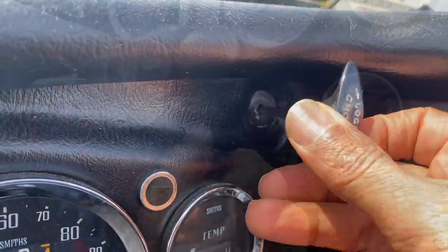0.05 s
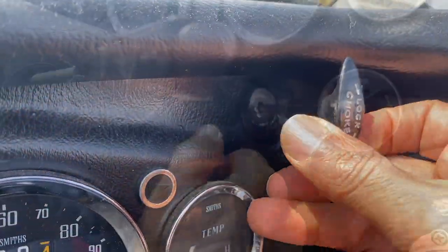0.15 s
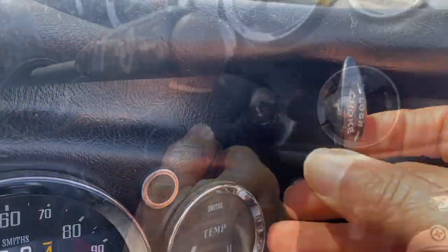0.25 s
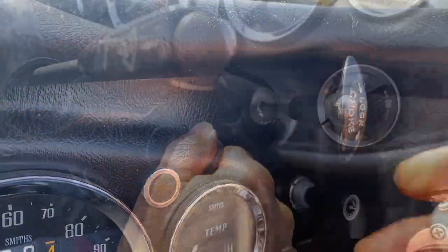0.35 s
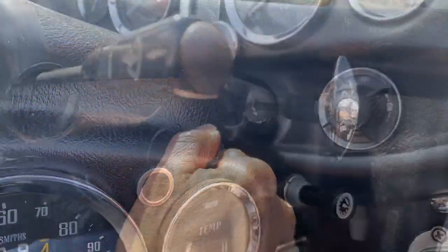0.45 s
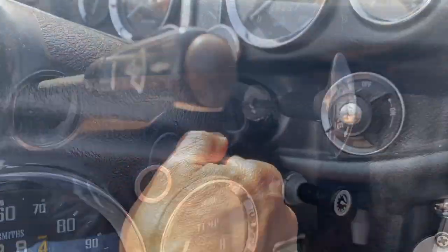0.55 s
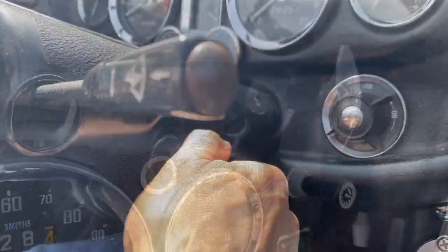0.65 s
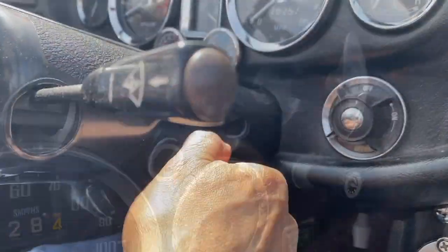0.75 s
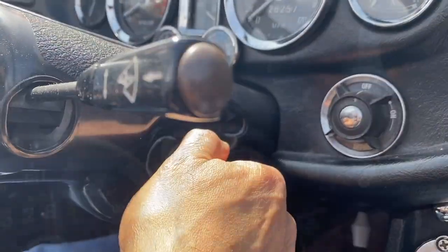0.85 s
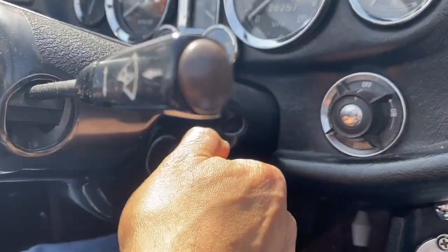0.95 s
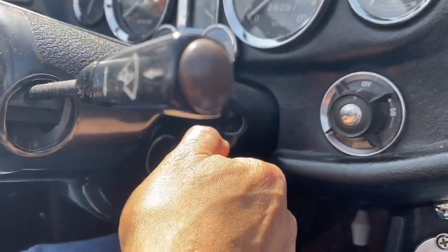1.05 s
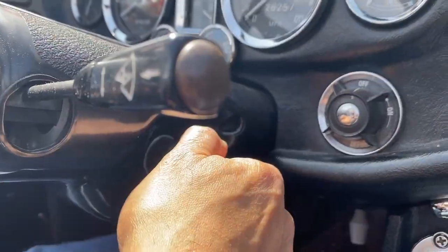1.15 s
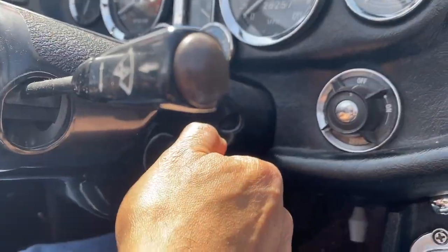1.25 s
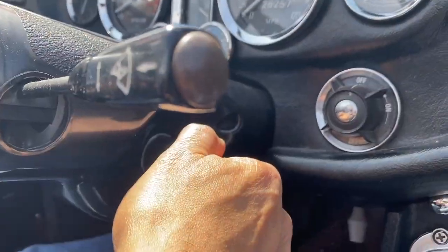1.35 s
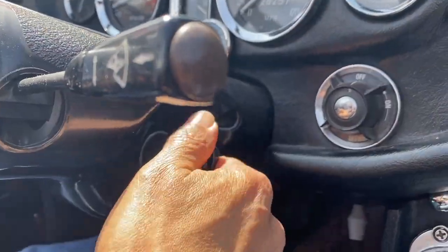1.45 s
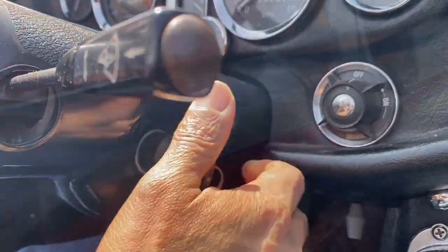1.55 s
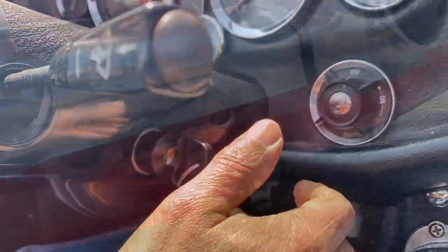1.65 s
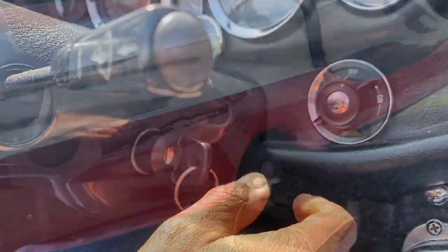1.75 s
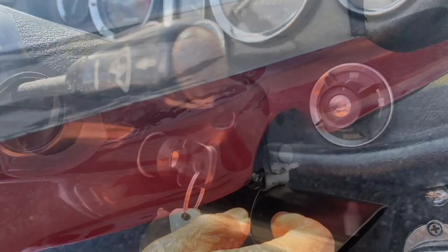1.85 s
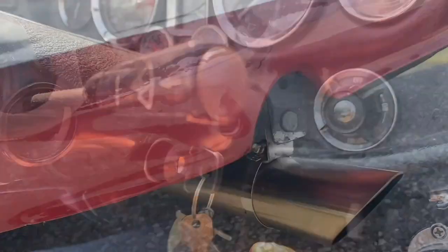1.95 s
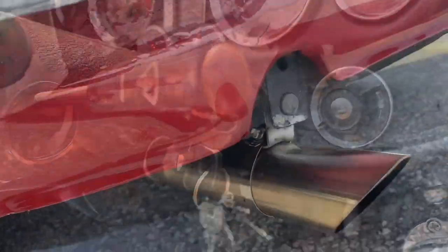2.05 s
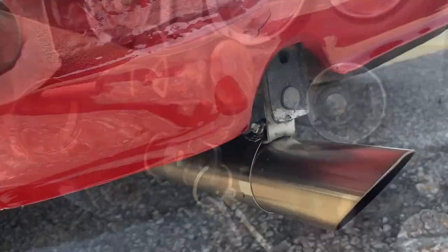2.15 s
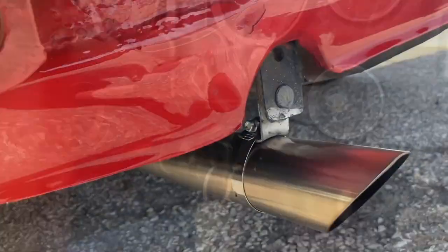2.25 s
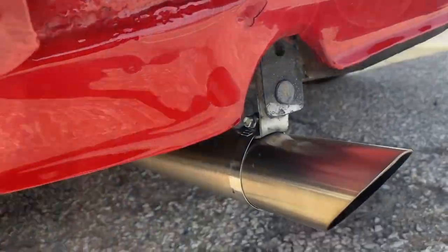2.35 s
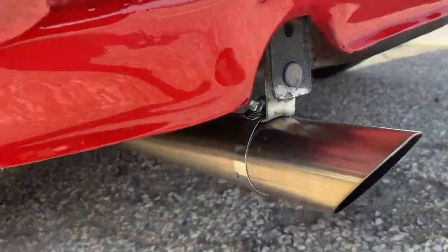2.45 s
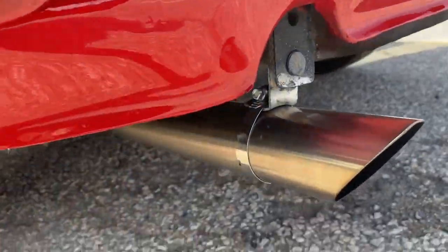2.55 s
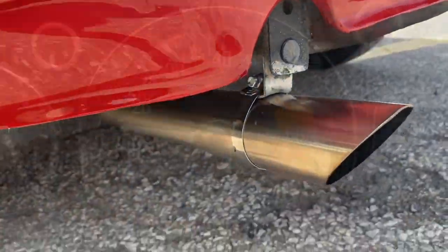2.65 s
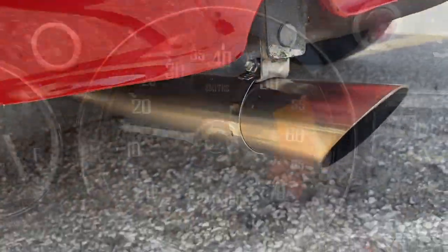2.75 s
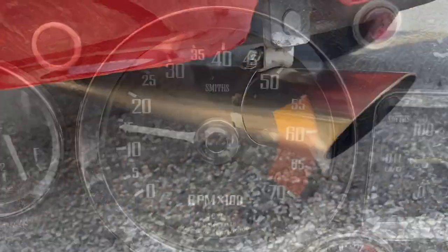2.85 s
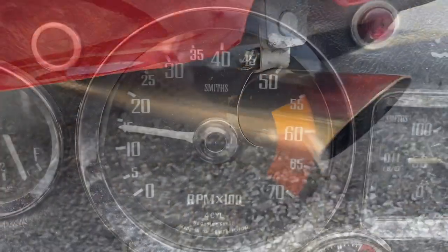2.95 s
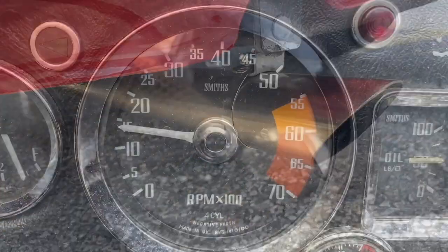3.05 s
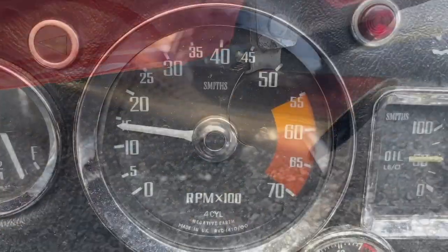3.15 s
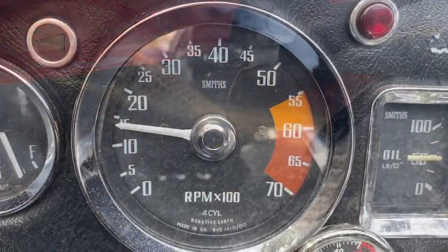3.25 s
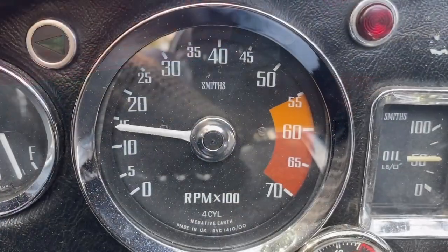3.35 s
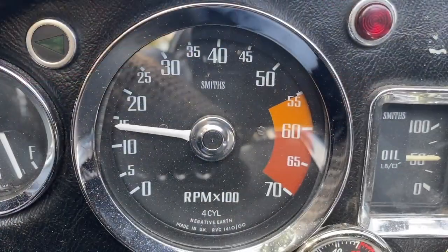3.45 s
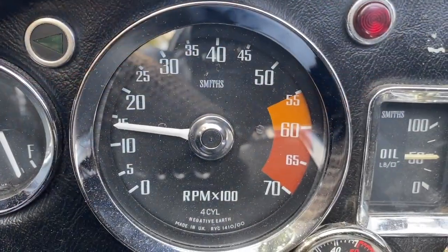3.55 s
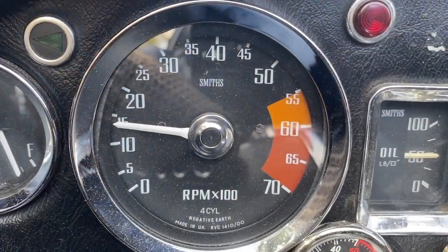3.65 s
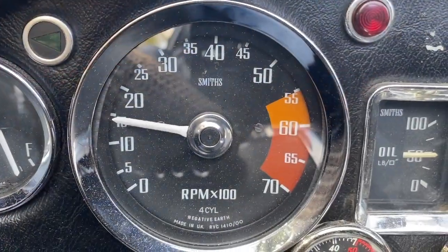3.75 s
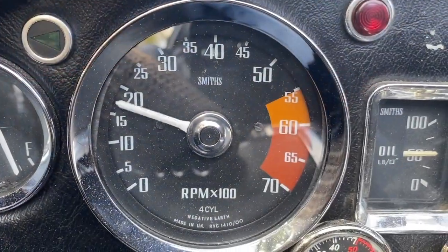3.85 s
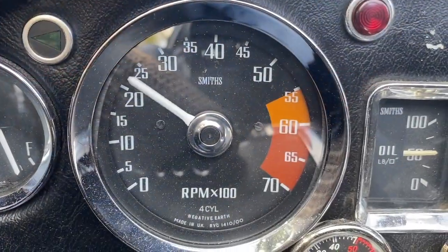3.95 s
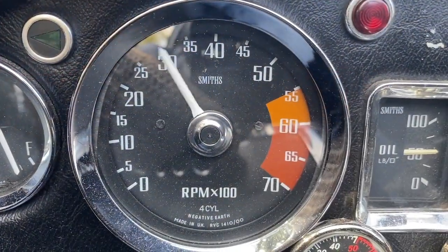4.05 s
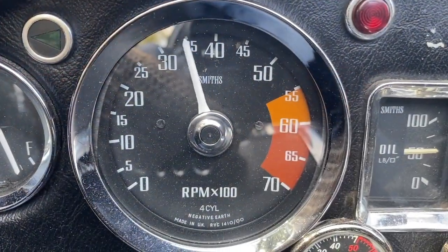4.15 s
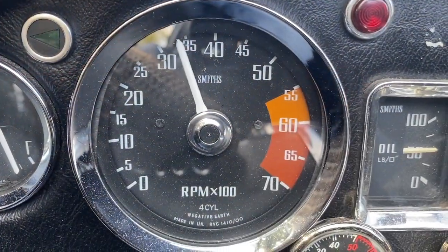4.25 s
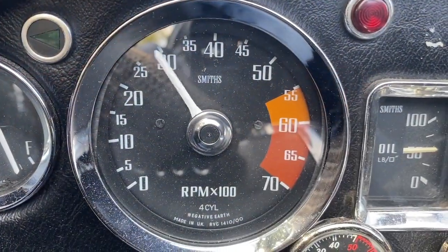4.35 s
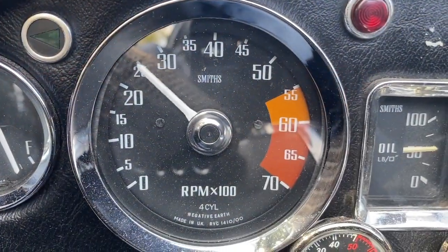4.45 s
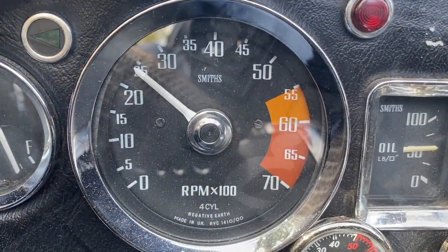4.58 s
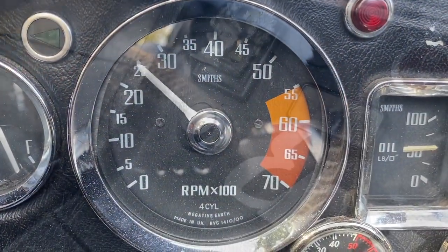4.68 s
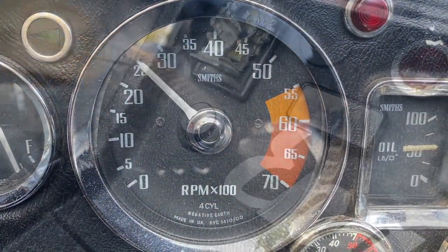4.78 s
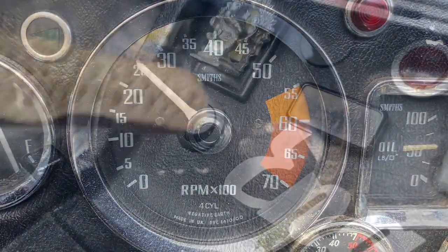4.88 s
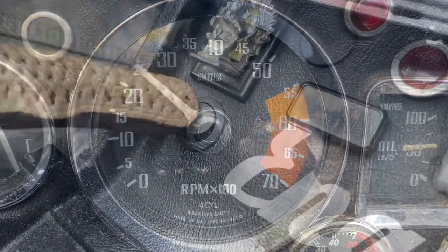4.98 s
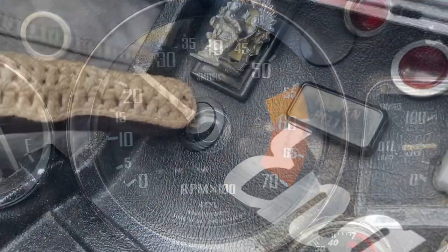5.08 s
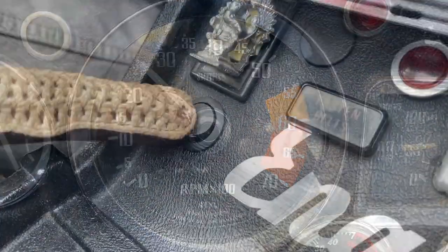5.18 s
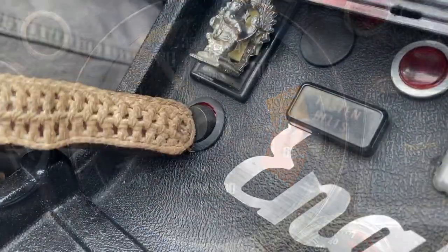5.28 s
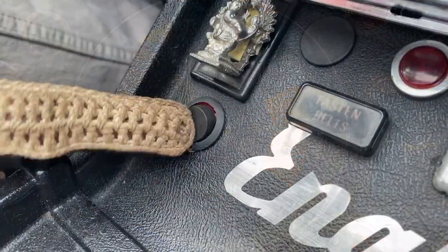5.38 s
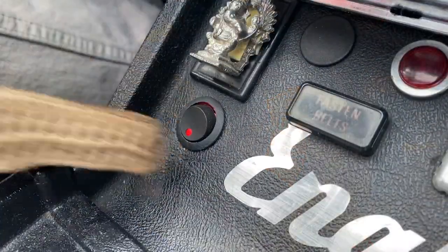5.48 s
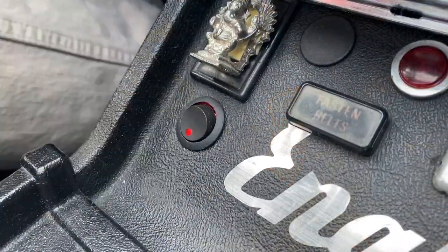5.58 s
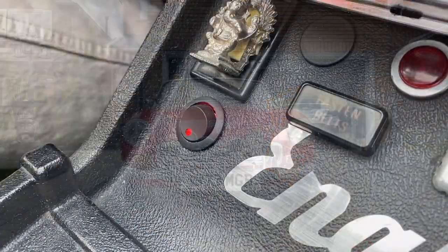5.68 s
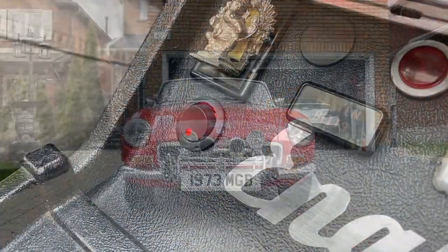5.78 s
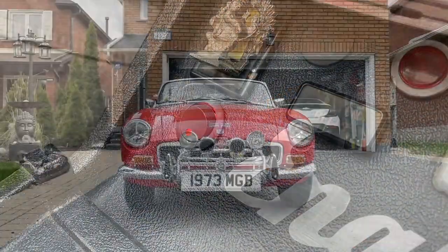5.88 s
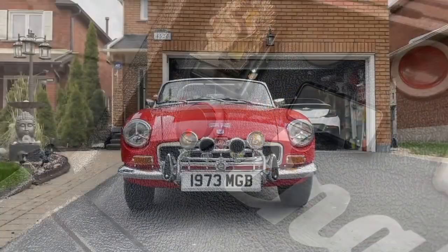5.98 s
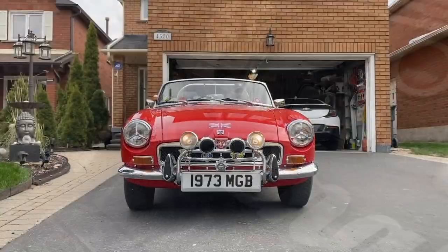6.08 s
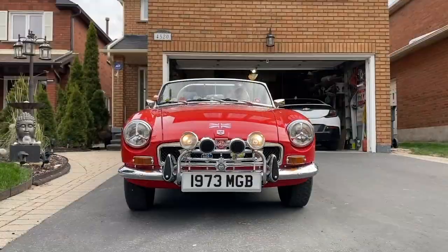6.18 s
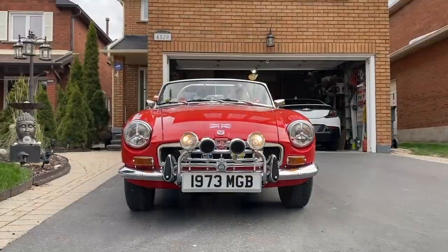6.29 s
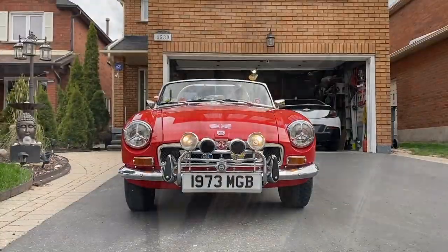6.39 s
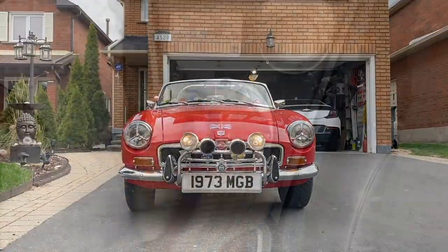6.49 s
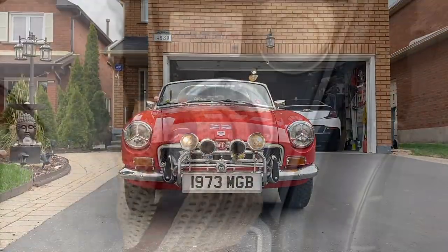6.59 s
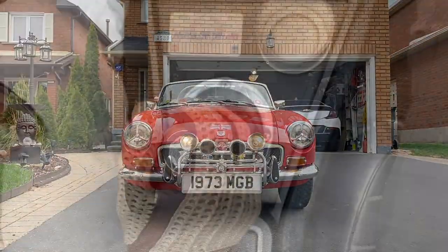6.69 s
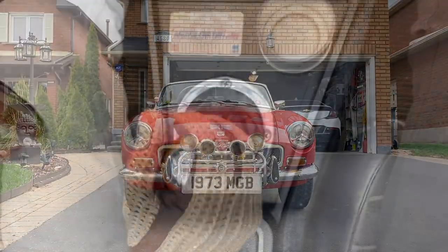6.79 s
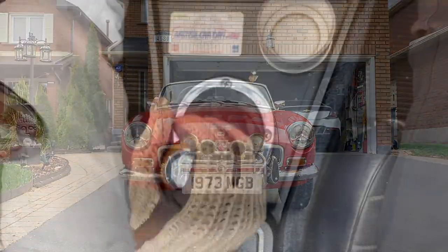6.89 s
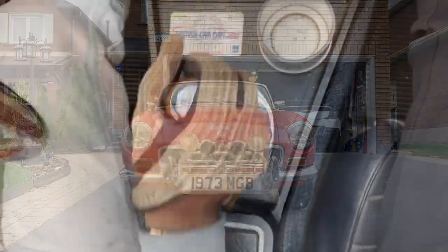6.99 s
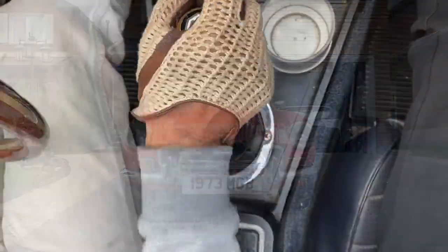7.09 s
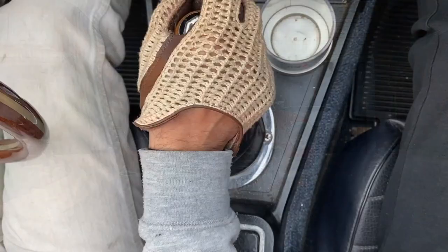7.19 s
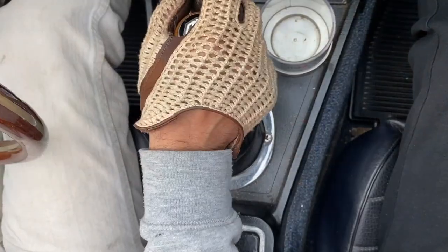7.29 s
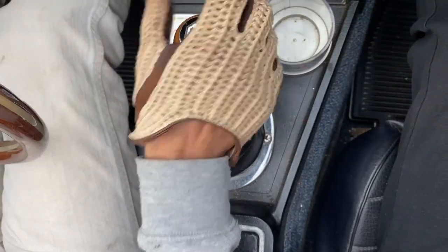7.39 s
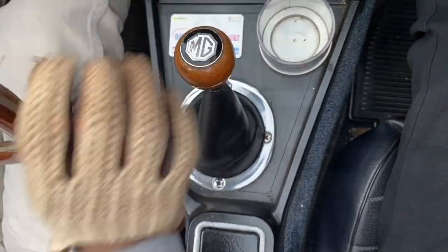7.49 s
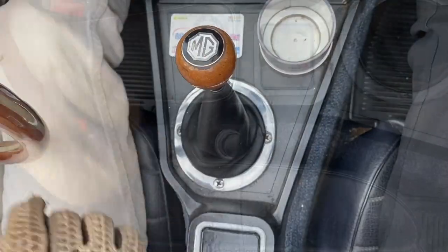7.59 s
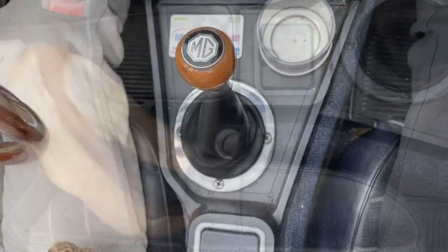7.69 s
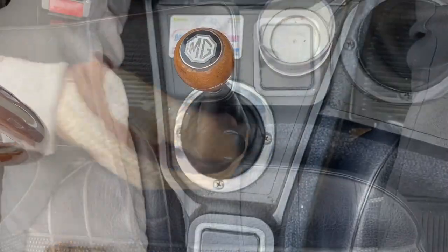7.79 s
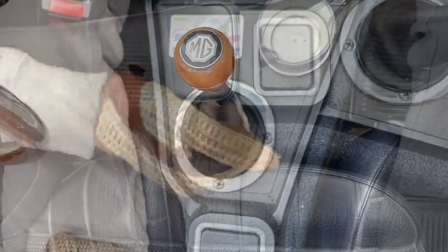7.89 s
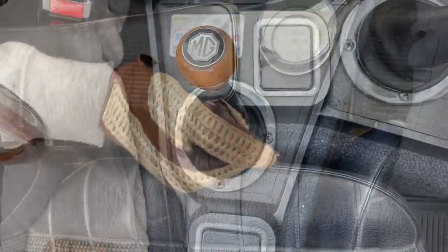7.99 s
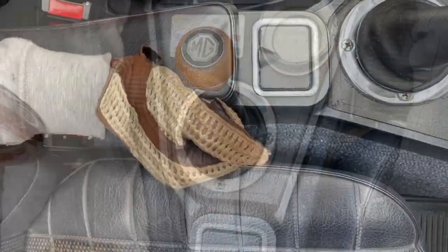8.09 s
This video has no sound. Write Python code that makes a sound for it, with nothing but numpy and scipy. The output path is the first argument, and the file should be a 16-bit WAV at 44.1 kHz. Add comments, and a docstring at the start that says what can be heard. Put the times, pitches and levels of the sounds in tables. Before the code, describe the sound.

Quiet outdoor air and a faint low hum, with a tiny key clink at 0.3 s. At 0.5 s the starter engages with a clack and grinds in uneven heaves, whining harder against each compression; dull thuds shake the body. Around 1.3 s the engine catches and flares, keys jingling brightly until 1.9. From 1.7 to 3.2 it crossfades to the tailpipe: loud, boomy, throaty idle with ragged spits, chuffs and pipe ticks. Back at the seat, a rev climbs from 3.6 to a droning peak near 4.0, sinks slowly, and is blipped again about 4.95 as it fades into a steady cabin idle. A sharp plastic switch snaps at 5.23. By 6.0 the idle is slower, quieter, heard in front with light valve ticking. From 6.4 it dissolves inside to deep, muffled, lumpy idle; the gear lever rattles and clacks near 7.0, with small knocks afterwards, engine still running at the end.

```python
"""Starting, revving and idling of a four-cylinder sports car

The old engine is cranked, catches with a jingle of keys, is revved and settles to a lumpy idle.
Each firing is a pressure pulse plus turbulent gas, coloured by the resonances of the listening place.
One place dissolves into the next: the seat, the tailpipe, the seat again, the bonnet, the gear lever.
Starter teeth, exhaust spits, valve ticks, a rocker switch and the moving lever are struck resonances
and filtered noise; scattering widens the sound most in the cabin."""
import sys
import numpy as np
from scipy import signal
from scipy.fft import rfft, irfft, next_fast_len
from scipy.io import wavfile
from scipy.ndimage import uniform_filter1d, map_coordinates

SR = 44100
rng = np.random.default_rng(int(sys.argv[2]) if len(sys.argv) > 2 else 0)


def store_pcm(level_fs):
    """Save levels as 16-bit WAV."""
    pcm = np.round(np.clip(level_fs, -1, 1) * 32767).astype(np.int16)
    wavfile.write(sys.argv[1], SR, np.atleast_2d(pcm).T)


N = 358533

# the four cylinders in firing order: (relative strength [dB], relative lateness [firing intervals])
CYLINDERS = [(0.5, -0.00069), (-4, 0.0797), (-1, 0.0207), (-3.5, -0.0705)]


def firing(rate, beat, response, uneven, jitter, rough, chuff, gas_hz):
    """Pulse-train excitation: a pressure pulse and a gust per firing; the strongest cylinder fires at beat."""
    turns = np.cumsum(rate * np.ones(N)) / SR  # counted in firings
    turns -= turns[round(beat * SR)]
    k = np.arange(np.ceil(turns[0]), turns[-1]).astype(int)
    strength_db, late = np.array(CYLINDERS)[k % len(CYLINDERS)].T
    chance = rng.standard_normal((SR // 40, 2))[k]
    moments = k + uneven * late + jitter * chance[:, 0]
    at = np.interp(moments, turns, np.arange(N)).astype(int)
    burn_db = 1.7 * chance[:, 1]
    kicks = unit(np.bincount(at, amp(uneven * strength_db + burn_db), N))
    flow_decay = np.exp(-1 / (0.0091 * SR))
    flow = unit(signal.lfilter([1], [1, -flow_decay], kicks))
    gas = unit(rng.standard_normal(N) * (1 + chuff * flow))
    # pulses carry the bass, turbulence takes over in the treble
    bass_share = max(1 / (1 + rough ** 2), .75)
    pulsed = lambda hz: bass_share / (1 + np.square(hz / gas_hz) ** 2)
    pulses = filtered(kicks, lambda hz: np.sqrt(pulsed(hz)))
    turbulence = filtered(gas, lambda hz: np.sqrt(1 - pulsed(hz)))
    return unit(through(pulses + turbulence, response))


# engine speed while starting: (time [s], compressions or firings [1/s])
CRANK = [(.5, 4.7), (1.0, 8.5), (1.25, 12), (1.35, 28.4), (1.45, 58), (1.6, 51), (1.8, 45)]
# the engine heaves over, gathers strength and flares as it catches: (time [s], effort [dB])
EFFORT = [(.52, -16), (.61, -4), (.75, -13), (.82, -20), (.98, -10), (1.04, -13), (1.1, -6), (1.25, -8),
          (1.285, 1), (1.41, 3), (1.48, 8.5), (1.55, 0)]
# engine colour at the seat while cranking: (frequency [Hz], relative density [dB])
CRANKING = [(18, -71), (30, -35), (59, 9), (110, 3.5), (222, -8), (404, -7.5), (485, -22), (837, -19.5),
            (1090, -29.5), (4780, -47), (11600, -54), (13200, -69), (15000, -56)]
# engine colour at the seat while catching: (frequency [Hz], relative density [dB])
CATCHING = [(15, -40), (25, -16), (49, 2), (97, -8), (175, -10.5), (224, -20.5), (385, -27.5), (748, -38.5),
            (846, -34.5), (1080, -50), (1250, -50), (4500, -57.5), (7000, -59), (9000, -66), (11700, -72),
            (16000, -88)]
BARK_PER_EFFORT, RASP_PER_EFFORT = .8, .45  # dB per dB


def start():
    """Growth of radiated level with load: boom follows the effort fully, bark and rasp less."""
    rate, effort_db = curves(CRANK)[0], curves(EFFORT)[0]
    lifts_db = effort_db, BARK_PER_EFFORT * effort_db, RASP_PER_EFFORT * effort_db
    cranking = firing(rate, .57, body(CRANKING), uneven=0.51, jitter=.01, rough=0.62, chuff=0.19, gas_hz=250)
    catching = firing(rate, 1.39, body(CATCHING), uneven=0.48, jitter=0.036, rough=1.0, chuff=.3, gas_hz=400)
    return heard("cranking", bands(cranking), lifts_db) + heard("catching", bands(catching), lifts_db)


# engine colour at the tailpipe: (frequency [Hz], relative density [dB])
TAILPIPE = [(15, -30), (25, -17), (55, 0.5), (104, -12), (164, 4), (233, -14.5), (289, -8), (399, -20.5),
            (457, -21), (666, -17.5), (848, -21), (945, -29), (2420, -33.5), (13500, -52), (15500, -51)]
# resonances of the exhaust pipe: (frequency [Hz], width [Hz], lift [dB])
PIPE_MODES = [(59.2, 36, 8.5), (132, 8.2, 6.5), (177, 13, 8.5), (199, 12, 3), (233, 19, -4.5),
              (287.4, 26, 9.5), (457, 30, 9), (650, 96, -11.5), (745, 24, 6), (843, 44, 12.5),
              (1030, 26, 6), (1340, 36, 4), (1610, 50, 8), (1744, 70, 6), (1980, 160, -4), (2440, 140, 4),
              (2660, 70, 4), (2850, 150, -4), (3250, 80, 3), (5750, 450, -8)]
# engine colour in the cabin: (frequency [Hz], relative density [dB])
CABIN = [(15, -62), (25, -5.5), (69, 4), (169, -18), (209, -26.5), (267, -21.5), (445, -33), (782, -36),
         (1140, -49), (1410, -44), (1660, -44), (10400, -58), (11800, -62), (13500, -58), (15500, -66)]
# engine colour in front of the bonnet: (frequency [Hz], relative density [dB])
BONNET = [(15, -68), (25, -24), (55, 19.5), (86, -18.5), (99, 7), (129, 1), (297, -22), (762, -25.5),
          (1750, -35.5), (1950, -31.5), (3630, -44), (6210, -47), (8580, -56.5), (10900, -45), (14300, -49),
          (15500, -62)]
# resonances heard in front of the bonnet: (frequency [Hz], width [Hz], lift [dB])
BONNET_MODES = [(138, 10, 7), (254.6, 30, 3.5), (388, 10, 8), (565, 50, -7), (660, 50, 4), (762, 90, 6),
                (1000, 70, -4), (1150, 70, 3), (1300, 60, -5), (1450, 90, 5), (1790, 80, -4),
                (2010, 200, 2)]
# engine colour beside the gear lever: (frequency [Hz], relative density [dB])
FOOTWELL = [(15, -57), (25, -11), (55, -1), (140, -2), (209, -20), (253, -18), (313, -35), (389, -28),
            (433, -38.5), (722, -37), (919, -41), (1620, -50), (11800, -69.5), (13900, -65), (15500, -64)]
# resonances of the cabin, heard beside the gear lever: (frequency [Hz], width [Hz], lift [dB])
CABIN_MODES = [(42.92, 28, 9.4), (67.4, 16, 5.3), (140.5, 11.5, 6.5), (254.6, 30, 3.46), (390.6, 7.9, 8.5),
               (725, 56, 4.3), (1550, 95, 6.8)]
# steady idles: (firings [1/s], a time at which the strongest cylinder fires [s])
COLD, WARM, IDLE = (44.3, 2.536), (38.65, 5.464), (34.05, 7.141)
SURGE_DB, SURGES_PER_S = 1.1, 12  # the burn is never quite steady
FLUTTER_DB, FLUTTERS_PER_S = 1.1, 34  # the rasp flickers


def idling():
    """Source-filter principle: lumpy periodic firing takes the colour of each listening place."""
    views = {
        "tailpipe": firing(*COLD, body(TAILPIPE, PIPE_MODES),
                           uneven=1.26, jitter=0.02, rough=0.47, chuff=0.79, gas_hz=400),
        "cabin": firing(*WARM, body(CABIN),
                        uneven=1.1, jitter=0.011, rough=0.44, chuff=0.067, gas_hz=301),
        "bonnet": firing(*IDLE, body(BONNET, BONNET_MODES),
                         uneven=0.77, jitter=0.013, rough=1.0, chuff=0.4, gas_hz=273),
        "footwell": firing(*IDLE, body(FOOTWELL, CABIN_MODES),
                           uneven=0.89, jitter=0.0074, rough=0.67, chuff=0.081, gas_hz=313)}
    surge_db, flutter_db = SURGE_DB * wobble(SURGES_PER_S), FLUTTER_DB * wobble(FLUTTERS_PER_S)
    return {place: heard(place, bands(sound), (0, surge_db, flutter_db)) for place, sound in views.items()}


# engine speed during the rev: (time [s], firings [1/s])
REV = [(3.58, 43), (3.64, 47.5), (3.774, 65.2), (3.862, 78.5), (3.946, 89.3), (4.06, 90.5), (4.334, 87),
       (4.64, 80.8), (4.94, 74.5), (5.046, 79.1), (5.18, 93.5)]
# blips of the throttle: (pressed [s], released [s], depth [0-1])
BLIPS = [(3.58, 3.84, 1), (4.93, 5.05, .6)]
# engine colour at the seat while revving: (frequency [Hz], relative density [dB])
REVVING = [(15, -66), (25, 2.5), (86, -5.5), (129, -10), (253, -15), (445, -25.5), (509, -23), (1340, -43),
           (1530, -41.5), (2120, -47), (6920, -59.5), (8580, -72), (10600, -59), (13500, -82), (15500, -74)]
# resonances heard while revving: (frequency [Hz], width [Hz], lift [dB])
REV_MODES = [(250, 24, 3.5), (510, 40, 3), (720, 50, 5.5), (782, 36, -6), (835, 36, 3), (1120, 90, 3),
             (1360, 140, -4), (1497, 70, 5.5), (1610, 90, 5)]
PRESS_S, RELEASE_S = .06, .15
BARK_DB_PER_OCTAVE, RASP_DB_PER_OCTAVE = 10.7, 15.5  # growth with engine speed
BARK_LOAD_DB, RASP_LOAD_DB = 3, 1.5  # growth at full throttle
MERGE_OCTAVES, RUMBLE_DB = .3, 1.5  # this far above idle the firings merge into a drone over a rumble


def rev():
    """Fusion of pulses into tone: thumps merge into a drone; bark and rasp grow with speed and throttle."""
    rate = curves(REV)[0]
    octaves = np.log2(rate / rate[0])
    throttle = sum(depth * np.interp(clock(), [on, on + PRESS_S, off, off + RELEASE_S], [0, 1, 1, 0])
                   for on, off, depth in BLIPS)
    merged = np.clip(octaves / MERGE_OCTAVES + throttle, 0, 1)
    engine = firing(rate, 3.74, body(REVVING, REV_MODES),
                    uneven=.7, jitter=0.009, rough=.7, chuff=0.4, gas_hz=420)
    thumps, bark, rasp = bands(engine)
    rumble_colour = [(25, -17), (55, 6), (110, 1.5), (150, -8.5), (300, -56)]  # (Hz, dB)
    rumble = unit(through(rng.standard_normal(N), body(rumble_colour)))
    boom = (1 - merged) * thumps + merged * amp(RUMBLE_DB) * rumble
    bark_db = BARK_DB_PER_OCTAVE * octaves + BARK_LOAD_DB * throttle
    rasp_db = RASP_DB_PER_OCTAVE * octaves + RASP_LOAD_DB * throttle
    engine = heard("revving", (boom, bark, rasp), (0, bark_db, rasp_db))
    return engine + presence("revving") * merged * drone(rate, throttle)


# how loudly the cabin answers a firing order that sweeps through it: (frequency [Hz], level [dB])
CABIN_DRONE = [(46, -44), (60, -24), (72, -20.5), (90, -20.5), (118, -26.5), (140, -29), (158, -35),
               (178, -27), (205, -46), (232, -33), (250, -27), (272, -33), (335, -44), (362, -36),
               (440, -47), (510, -42), (600, -48), (720, -49)]
DRONE_LOAD_DB = 7.5  # growth of the deepest orders at full throttle
LOPE_DB = -15  # the half orders of the unequal cylinders


def drone(rate, throttle, count=8):
    """Order resonance: firing orders and half orders swell as they cross the cabin's resonances."""
    phase = 2 * np.pi * np.cumsum(rate * (1 + 0.005 * wobble(30))) / SR
    out = np.zeros(N)
    for k in np.arange(1, count + .5, .5):
        hz = k * rate
        load_db = DRONE_LOAD_DB * throttle * below(hz, 160)
        lope_db = LOPE_DB * (k % 1 > 0)
        slow_db = -18 * (k > 3) * (1 - rate / rate.max())  # higher orders need speed
        level_db = along(CABIN_DRONE, hz) + load_db + lope_db + slow_db + np.sqrt(k) * wobble(20)
        out += amp(level_db) * np.sin(k * phase + rng.uniform(0, 2 * np.pi))
    return out


# the loudest spits of the exhaust: (time [s], relative level [dB], upper edge [Hz])
SPITS = [(1.822, -41, 5500), (1.925, -36.5, 4500), (1.998, -32, 7000), (2.094, -33.5, 5500),
         (2.137, -36, 9000), (2.185, -28, 8000), (2.281, -32, 6000), (2.361, -26, 9000), (2.462, -32, 5000),
         (2.54, -28, 5500), (2.633, -30, 7500), (2.655, -35, 12000), (2.68, -30.5, 7000),
         (2.703, -33, 12000), (2.726, -28.5, 7000), (2.815, -34, 5500), (2.908, -33.5, 5500),
         (2.997, -35, 4500), (3.09, -40, 4000), (3.18, -43, 4000)]
# colour of the spits and chuffs: (frequency [Hz], level [dB])
SPIT_COLOUR = [(200, -33), (600, 16), (1300, 2.5), (2800, 3.5), (4500, 2), (7000, -3), (9000, -7),
               (12000, -6), (16000, -45)]
# colour of the ticks: (frequency [Hz], level [dB])
TICK_COLOUR = [(500, -12), (1000, -6), (3000, 0), (5000, -5), (5700, -10), (6600, 3), (9000, -12),
               (11500, -7), (16000, -22)]
# colour of the pipe's ping: (frequency [Hz], level [dB])
PING_COLOUR = [(250, -20), (800, 0), (1200, -20), (5000, -50)]
PING_DB = -9
SPUTTER_HZ, SPUTTER_DB, SPIT_SCATTER_DB = 9000, -44, 2  # every firing sputters a little
SPIT_LAG_S = .007  # after the firing
SPIT_SWELL_S, CRACKLE_DB, CRACKLES_PER_S = .0095, 3.2, 900  # a spit swells, and breaks up leaving the pipe
CHUFF_AT_S, CHUFF_DB, CHUFF_HZ = 2.6135, -31, 13000  # one of the short, bright chuffs, one a cycle
TICK_AT_S, TICK_DB, TICK_SCATTER_DB = 2.4935, -32, 1.5  # one of the ticks, one a turn


def tailpipe():
    """Jet noise and pipe modes: ragged spits and chuffs of gas; a tick each crank turn pings the pipe."""
    rate, beat = COLD
    near = presence("tailpipe")
    t = np.arange(SR // 8) / SR
    swell = (t / SPIT_SWELL_S * np.exp(1 - t / SPIT_SWELL_S)) ** 2

    def repeat(at, per_s, db, shape, hz):
        """Periodic gusts of slightly varying level."""
        times = beats("tailpipe", at, per_s)[1]
        return placed((s, amp(db + SPIT_SCATTER_DB * rng.normal()) * spit(shape, hz)) for s in times)

    loud = placed((s, amp(db) * spit(swell, hz)) for s, db, hz in SPITS)
    sputter = repeat(beat + SPIT_LAG_S, rate, SPUTTER_DB, swell, SPUTTER_HZ)
    chuffs = repeat(CHUFF_AT_S, rate / len(CYLINDERS), CHUFF_DB, strike(rise=.004, t60=.05), CHUFF_HZ)
    crackle = unit(amp(CRACKLE_DB * wobble(CRACKLES_PER_S)))
    gas = (loud + near ** .6 * (sputter + chuffs)) * crackle
    turns = beats("tailpipe", TICK_AT_S, rate / 2)[1]
    ticks_db = TICK_DB + TICK_SCATTER_DB * rng.standard_normal(len(turns))
    ticks = puffs(zip(turns, ticks_db), strike(rise=.0007, t60=.022))
    ping = amp(PING_DB) * body(PING_COLOUR, PIPE_MODES)
    pings = placed((s, ping) for s in turns)
    return through(gas, body(SPIT_COLOUR, PIPE_MODES)) + near ** .8 * (through(ticks, body(TICK_COLOUR)) + pings)


SPIT_TINT_DB, TINT_STEP_HZ = 3.5, 450  # no two spits have the same colour


def spit(shape, edge_hz):
    """Turbulent jet noise: a gust of gas with its own upper edge and a chance colour."""
    hz = np.fft.rfftfreq(len(shape), 1 / SR)
    tint = map_coordinates(rng.standard_normal(len(hz)), [hz / TINT_STEP_HZ])
    tint_db = SPIT_TINT_DB * tint * (1 - below(hz, 1200))
    noise = rfft(rng.standard_normal(len(shape)))
    return shape * irfft(noise * amp(tint_db) / np.hypot(1, (hz / edge_hz) ** 2), len(shape))


# the starter slows and grows louder against a compression, then runs free:
# (time [s], tooth mesh frequency [Hz], level [dB])
STARTER = [(.52, 205, -53), (.555, 214, -47), (.63, 222, -50), (.68, 240, -49.5), (.745, 254, -57),
           (.775, 248, -50), (.825, 239, -47), (.86, 228, -43.5), (.905, 208, -43.5), (.935, 202, -46),
           (.965, 198, -60), (1.14, 205, -61), (1.19, 213, -55), (1.29, 239, -55), (1.45, 270, -56)]
# harmonics of the tooth mesh: (multiple [1], level [dB])
GEAR_ORDERS = [(2, -9), (3, -2), (4, 6.5), (5, -4), (6, -1), (7, -8), (8, -9), (10, -12), (13, -8),
               (14, -10), (19, -13)]
# colour of the starter's casing: (frequency [Hz], level [dB])
GEAR_CASE = [(200, -16), (350, -5), (550, -9), (950, -3), (1500, -10), (2300, -18), (4700, -19),
             (5500, -24), (7000, -23), (12000, -32), (15000, -41)]
# the starter's casing rings: (frequency [Hz], width [Hz], lift [dB])
CASE_MODES = [(322, 18, 13), (404, 20, 12), (640, 40, 7), (810, 36, 13), (1090, 70, -9), (1230, 70, 7),
              (1430, 52, 8), (1660, 60, 5), (2010, 55, 8), (2850, 140, 5), (3120, 100, 5), (3900, 77, 7),
              (4680, 160, 6)]
GRIND_DB, WHINE_DB = -1.7, -4  # tooth noise and clean tones
WHISTLE_ORDER, WHISTLE_DB = 19, -67
WHISTLE_S = (1.17, 1.23, 1.42, 1.47)  # fades in, full, fades out, gone


def starter():
    """Gear-mesh excitation: pinion teeth whine and ring the casing; the freed armature whistles upward."""
    mesh_hz, db = curves(STARTER)
    phase = 2 * np.pi * np.cumsum(mesh_hz * (1 + .016 * wobble(220))) / SR
    whine = unit(sum(amp(level + 3 * wobble(50)) * np.sin(k * phase) for k, level in GEAR_ORDERS))
    tooth_noise = rng.standard_normal(N) * (1 + .8 * np.cos(phase))
    grind = unit(through(tooth_noise, body(GEAR_CASE, CASE_MODES)))
    whistle_gain = amp(WHISTLE_DB + 4 * wobble(90)) * np.interp(clock(), WHISTLE_S, [0, 1, 1, 0])
    whistle = whistle_gain * np.sin(WHISTLE_ORDER * phase)
    engaged = (clock() > STARTER[0][0]) * (clock() < STARTER[-1][0])
    return (amp(WHINE_DB) * whine + amp(GRIND_DB) * grind) * amp(db) * engaged + whistle


def tappets():
    """Periodic impact: eight valves tick in turn under the bonnet, each at its own strength."""
    rate, beat = IDLE
    k, times = beats("bonnet", beat, 2 * rate)
    valve_db = 3 * rng.standard_normal(8)[k % 8]
    ticks = puffs(zip(times, valve_db), strike(rise=0.00037, t60=0.016))
    colour = [(400, -6), (750, 3), (2300, 2), (4000, -18.5), (13000, -17)]  # (Hz, dB)
    return amp(-43) * presence("bonnet") * through(ticks, body(colour))


# starter engagement, first coughs and body thuds: (time [s], relative level [dB])
THUDS = [(0.573, -24.5), (0.973, -27.5), (1.066, -28.5), (1.104, -27.5), (1.217, -14.5), (1.311, -14),
         (1.414, -18), (6.444, -26)]
# colour of the body shell: (frequency [Hz], level [dB])
THUD_COLOUR = [(120, -26), (230, 2), (340, 1), (450, -4), (620, -16.5), (900, -20.5), (1300, -24),
               (2500, -38), (8000, -50), (15000, -62)]
# resonances of the body shell: (frequency [Hz], width [Hz], lift [dB])
THUD_MODES = [(255, 50, 6), (400, 36, 4)]


def thuds():
    """Forced response of a panel: heavy shoves thump the body shell."""
    shoves = sum(amp(db - 3) * burst(s - .003, rise=0.005, t60=0.085) for s, db in THUDS)
    return through(shoves, body(THUD_COLOUR, THUD_MODES))


# keys and small metal parts clink: (time [s], relative level [dB])
KEYS = [(0.3022, -47), (1.4092, -37), (1.4243, -33), (1.4546, -23), (1.4616, -28), (1.5226, -28.5),
        (1.7215, -34), (1.8791, -19.5)]
# ringing of the keys: (frequency [Hz], level [dB], 60 dB decay time [s])
KEY_MODES = [(7770, 1.5, .055), (9485, -10, 0.05), (10300, -9, .04), (11060, -4, 0.05), (11600, -7, .04),
             (12500, -8, 0.04), (14400, -2, 0.05), (15300, -7, .04)]
KEY_BOUNCE_S, KEY_LOSS_DB = .013, 6  # the keys touch again, weaker each time


def keys(count=3):
    """Modal excitation by impact: each touch bounces and rings the keys at new strengths."""
    t = np.arange(SR // 3) / SR
    contacts = [(s + KEY_BOUNCE_S * k * rng.uniform(.7, 1.3), db - KEY_LOSS_DB * k)
                for s, db in KEYS for k in range(count)]
    rings = []
    for s, db in contacts:
        chance = rng.standard_normal((len(KEY_MODES), 2)) * [2.5, .008]  # strength in dB, relative detuning
        ring = sum(amp(level + more - 60 * t / t60) * np.sin(2 * np.pi * hz * (1 + off) * t)
                   for (hz, level, t60), (more, off) in zip(KEY_MODES, chance))
        rings.append((s, amp(db - 15) * ring))
    cracks = puffs(contacts, amp(-8) * strike(rise=.0009, t60=.023))
    return placed(rings) + filtered(cracks, lambda hz: 1 - below(hz, 10000))


# contacts of the rocker switch: (time [s], relative level [dB])
SWITCH = [(5.208, -27), (5.2345, -8), (5.2364, -10), (5.2415, -21)]
# colour of the snaps: (frequency [Hz], relative density [dB])
SWITCH_COLOUR = [(400, -4), (1400, -3), (2400, -12), (3500, -11), (4550, -5.5), (5600, -5), (6600, -5),
                 (8000, -6), (11000, -7.5), (14500, -10), (16000, -4)]
# ringing of the switch housing: (frequency [Hz], level [dB], 60 dB decay time [s])
SWITCH_MODES = [(1400, -14, .03), (2370, -15, .035), (4450, 0, .024), (5590, -7, .03), (6580, -5, .03),
                (14500, -4, .016)]


def switch():
    """Snap-through impact: the plastic rocker tips, snaps home and bounces; the hardest rings its housing."""
    snap = strike(rise=.0007, t60=.012) + amp(-17) * strike(rise=.002, t60=.042)
    snaps = puffs(SWITCH, amp(-7.5) * snap)
    s, db = max(SWITCH, key=lambda row: row[1])
    housing = sum(amp(db + level - 16) * mode(s, hz, t60) for hz, level, t60 in SWITCH_MODES)
    return through(snaps, body(SWITCH_COLOUR)) + housing


# solenoid, dashboard and gear lever clacks, and the engine's sharp coughs as it catches: # (time [s], relative
# level [dB], centre frequency [Hz], 60 dB decay time [s])
CLACKS = [(0.0448, -56.5, 3300, .06), (0.522, -39, 1900, .05), (0.6423, -35, 1960, .025),
          (1.0538, -34, 1520, .09), (1.056, -46, 4700, .07), (1.2745, -38, 1750, .08),
          (1.398, -39, 4130, .13), (1.42, -33, 900, .13), (1.642, -35, 900, .12), (3.354, -36, 900, .05),
          (3.924, -33, 1550, .06), (6.943, -40, 1600, .04), (6.982, -38, 1700, .04),
          (7.036, -42, 4700, .05), (7.044, -36, 1650, .05), (7.0773, -40, 13500, .03),
          (7.1062, -38, 13500, .035), (7.364, -38, 1700, .05), (7.6924, -46, 1590, .06),
          (8.09, -47, 1700, .06)]


def clacks():
    """Damped impact: short knocks of the controls and sharp coughs of the catching engine, each around its own
    pitch."""
    out = np.zeros(N)
    for s, db, hz, t60 in CLACKS:
        colour = [(hz / 6, -12), (hz / 2, -5), (hz, 0), (hz * 1.43, -11),
                  (hz * 2.5, -7), (hz * 4, -20), (hz * 8, -34)]
        out += through(amp(db - 6.5) * burst(s, rise=0.001, t60=t60), body(colour))
        out += amp(db - 10) * mode(s, hz, t60)
    return out


# the gear lever rattles through its gate: (time [s], level [dB])
LEVER = [(6.92, -70), (6.945, -59), (7.005, -61), (7.05, -52), (7.075, -59), (7.13, -72)]
# colour of the rattle: (frequency [Hz], level [dB])
LEVER_COLOUR = [(300, -14), (800, -2), (1700, -1), (2800, -11), (4700, -12), (7000, -16), (15000, -24)]
# resonances of the lever: (frequency [Hz], width [Hz], lift [dB])
LEVER_MODES = [(1700, 250, 6), (4700, 300, 7)]


def gear_lever():
    """Friction noise: loose linkage chatters as the lever slides."""
    sliding = (clock() > LEVER[0][0]) * (clock() < LEVER[-1][0])
    chatter = unit(rng.standard_normal(N) * amp(5 * wobble(260)))
    return through(chatter * amp(curves(LEVER)[0]) * sliding, body(LEVER_COLOUR, LEVER_MODES))


# colour of the outdoor air: (frequency [Hz], relative density [dB])
AIR = [(15, -39), (25, -9), (75, -5), (115, -10.5), (363, -26), (588, -37.5), (7280, -55.5), (8550, -59),
       (10600, -51), (13500, -74), (15000, -62)]
# low hum before the start: (time [s], level [dB])
HUM = [(0, -42), (.13, -37.5), (.24, -45), (.5, -47)]
# colour of the hum's noise: (frequency [Hz], relative density [dB])
HUM_COLOUR = [(15, -68), (25, -33), (43, -9), (53, 1), (75, 8), (103, -35), (146, -13), (360, -38),
              (400, -45), (520, -72), (880, -120)]


def background():
    """Stationary ambient noise: quiet outdoor air, and a low hum in the cabin before the start."""
    air = amp(-49.5) * through(rng.standard_normal(N), body(AIR))
    hum_noise = 0.47 * through(rng.standard_normal(N), body(HUM_COLOUR))
    hum_tone = 1.45 * np.sin(2 * np.pi * 69 * clock() + 0.75 * wobble(4.9))
    hum_gain = amp(curves(HUM)[0]) * np.interp(clock(), [.5, .6], [1, 0])
    return air + (hum_noise + hum_tone) * hum_gain


# where the engine is heard from; one place dissolves into the next:
# (fades in from [s], full at [s], fades out from [s], gone at [s], boom [dB], bark [dB], rasp [dB])
PLACES = {"cranking": (.5, .53, 1.3, 1.45, -25, -38, -56),
          "catching": (1.22, 1.41, 1.8, 2.3, -25.8, -35.3, -53.5),
          "tailpipe": (1.66, 2.28, 2.7, 3.23, -18, -19, -45),
          "revving": (2.7, 3.2, 4.52, 5.3, -27, -39.8, -58.5),
          "cabin": (4.6, 5.3, 5.82, 5.96, -24.5, -37.5, -57),
          "bonnet": (5.74, 6.02, 6.42, 7.15, -36, -34.7, -46.3),
          "footwell": (6.42, 7.12, 7.5, 9.8, -28.3, -34, -58.5)}


def presence(place):
    """Linear cross-fade: gain 0-1 of a listening place, which fades in, holds and fades out."""
    return np.interp(clock(), PLACES[place][:4], [0, 1, 1, 0])


def heard(place, parts, lifts_db=(0, 0, 0)):
    """Superposition of bands: boom, bark and rasp at a place's levels, each raised by its lift."""
    levels_db = PLACES[place][4:]
    return presence(place) * sum(part * amp(db + lift) for part, db, lift in zip(parts, levels_db, lifts_db))


def beats(place, at, rate):
    """Periodicity: numbers and times of a steady beat through time at, while a place is heard."""
    first, _, _, last = PLACES[place][:4]
    k = np.arange(np.ceil((first - at) * rate), (last - at) * rate).astype(int)
    return k, at + k / rate


BOOM_HZ, RASP_HZ = 130, 896  # the bark lies between these


def bands(sound):
    """Band splitting: boom, bark and rasp of a sound, each held at a running rms of 1."""
    low = filtered(sound, lambda hz: below(hz, BOOM_HZ))
    high = filtered(sound, lambda hz: 1 - below(hz, RASP_HZ))

    def even(x):
        """Division by the running rms."""
        power = uniform_filter1d(uniform_filter1d(x * x, size=5000), size=5000)
        return x / np.sqrt(np.abs(power) + 1e-12)

    return [even(low), even(sound - low - high), even(high)]


def strike(rise, t60):
    """Exponential decay: envelope of a quick attack and its fall."""
    t = np.arange(SR // 8) / SR
    return (1 - np.exp(-t / rise)) * amp(-60 * t / t60)


def placed(sounds):
    """Superposition in time of (s, sound) pairs."""
    out = np.zeros(N + SR)
    for s, sound in sounds:
        out[round(s * SR):][:len(sound)] += sound
    return out[:N]


def puffs(events, shape):
    """Shaped noise: a puff with the given envelope for each (s, dB)."""
    return placed((s, amp(db) * shape * rng.standard_normal(len(shape))) for s, db in events)


def burst(s, rise, t60):
    """Shaped noise: one puff that starts at time s."""
    t = np.arange(SR // 3) / SR
    return placed([(s, rng.standard_normal(len(t)) * (1 - np.exp(-t / rise)) * amp(-60 * t / t60))])


def mode(s, hz, t60):
    """Damped oscillator: one resonance, struck at time s."""
    shape = strike(rise=.001, t60=t60)
    return placed([(s, shape * np.sin(2 * np.pi * hz * np.arange(len(shape)) / SR))])


def body(spectrum, modes=(), size=16384):
    """Minimum-phase response: causal, energy 1, of a colour with resonances on it."""
    hz = np.fft.rfftfreq(size, 1 / SR)
    db = along(spectrum, hz) + sum(lift / (1 + (2 * (hz - f) / width) ** 2) for f, width, lift in modes)
    cepstrum = irfft(np.log(np.maximum(amp(db), 1e-6)))
    # folding the cepstrum forward in time makes the response causal
    cepstrum[1:size // 2] *= 2
    cepstrum[size // 2 + 1:] = 0
    response = irfft(np.exp(rfft(cepstrum)))[:size // 2]
    return response / np.linalg.norm(response)


def through(x, response):
    """Convolution: x rings a response."""
    return signal.fftconvolve(x, response)[:N]


def filtered(x, response):
    """Linear filtering: x times a response of frequency."""
    m = next_fast_len(N + SR // 2)
    return irfft(rfft(x, m) * response(np.fft.rfftfreq(m, 1 / SR)), m)[..., :N]


def below(hz, edge_hz):
    """Low-pass law: gain 0-1 falling steeply above the edge."""
    return 1 / (1 + (hz / edge_hz) ** 8)


def metallic(x, t60, wet):
    """Modal density: countless short modes of the metalwork ring above about 1.3 kHz."""
    t = np.arange(SR // 16) / SR
    ring = rfft(rng.standard_normal(len(t)) * t * amp(-60 * t / t60))
    ring = irfft(ring / np.sqrt(uniform_filter1d(np.abs(ring) ** 2, size=25)))
    rung = (x + wet * through(x, ring)) / np.hypot(1, wet)
    return rung + filtered(x - rung, lambda hz: below(hz, 1260))


def spread(x, t60, width):
    """Diffuse scattering: nearby surfaces scatter the sound differently to each side."""
    t = np.arange(SR // 4) / SR
    scatter = rfft(rng.standard_normal(len(t)) * amp(-60 * t / t60) * t)
    side = through(x, irfft(scatter / np.sqrt(uniform_filter1d(np.abs(scatter) ** 2, size=15))))
    side = filtered(side, lambda hz: amp(along(width, hz)))
    return np.array([x + side, x - side])


def amp(db):
    """Logarithmic level law: decibels to gain."""
    return 10 ** (np.asarray(db) / 20)


def unit(x):
    """Normalisation to rms 1."""
    return x / np.sqrt(np.mean(x ** 2) + 1e-20)


def clock():
    """Sampling: the time of each sample in seconds."""
    return np.arange(N) / SR


def curves(rows):
    """Linear interpolation: one value per sample for each column after the time."""
    s, *cols = np.transpose(rows)
    return [np.interp(clock(), s, c) for c in cols]


def along(points, hz):
    """Interpolation of (Hz, value) points on a logarithmic frequency axis."""
    f, v = np.transpose(points)
    return np.interp(np.log(hz + 1), np.log(f + 1), v)


def wobble(rate):
    """Slow random modulation: a smooth curve with rate knots a second."""
    return map_coordinates(rng.standard_normal(int(N * rate / SR) + 4), [clock() * rate])


# the cabin scatters the sound widely: (frequency [Hz], side re mid [dB])
CABIN_WIDTH = [(50, -26), (90, -16), (150, -10), (350, -6), (750, 1), (1500, 0), (4000, -2), (12000, -1)]
# width at the tailpipe, in the open: (frequency [Hz], side re mid [dB])
TAILPIPE_WIDTH = [(60, -16), (200, -24), (450, -19), (700, -12), (1300, -9), (3500, -10), (6000, -4),
                  (12000, -1)]
# width in front of the bonnet: (frequency [Hz], side re mid [dB])
BONNET_WIDTH = [(80, -13), (200, -24), (1300, -20), (2400, -10), (3600, 3), (6000, -2), (12000, 0)]


def scene():
    """Stereo superposition: the car sits a little to the right, wide from the seats, narrower outside."""
    idle = idling()
    ringing = lambda x: metallic(x, t60=.022, wet=.25)
    engine = start() + rev() + idle["cabin"] + idle["footwell"]
    inside = ringing(engine + starter() + clacks() + gear_lever()) + thuds() + background()
    behind = ringing(idle["tailpipe"] + tailpipe())
    in_front = ringing(idle["bonnet"] + tappets())
    car = (spread(inside, t60=0.037, width=CABIN_WIDTH)
           + spread(behind, t60=0.02, width=TAILPIPE_WIDTH)
           + spread(in_front, t60=0.037, width=BONNET_WIDTH))
    controls = spread(keys() + switch(), t60=0.0043, width=CABIN_WIDTH)
    return car * amp([[-1.2], [1.1]]) + controls  # left and right in dB


TOP_HZ = 15850  # band limit


def record(dry):
    """Band limiting and soft saturation: the microphone sheds deep bass and rounds the loudest peaks."""
    sound = filtered(dry, lambda hz: below(30, hz + 1) ** 2)
    sound = sound / (1 + np.abs(sound / .52) ** 6) ** (1 / 6)
    return filtered(sound, lambda hz: 1 / (1 + (hz / TOP_HZ) ** 240))


dry = scene()
out = record(dry)
store_pcm(out)
```